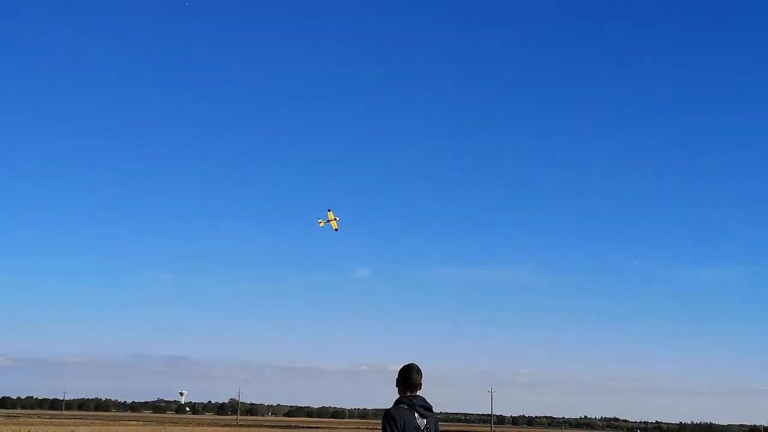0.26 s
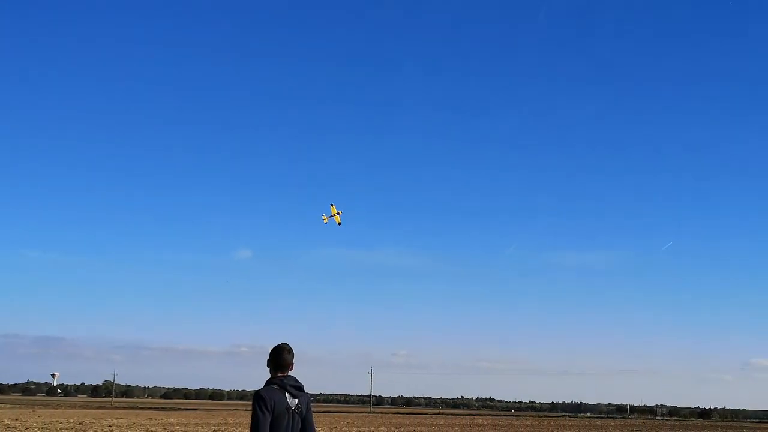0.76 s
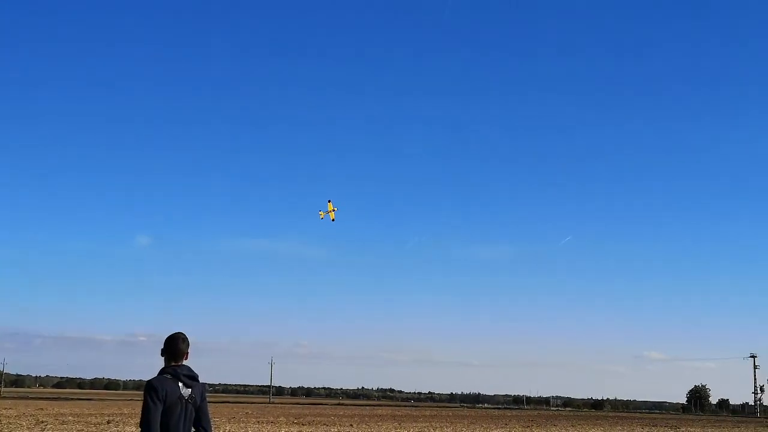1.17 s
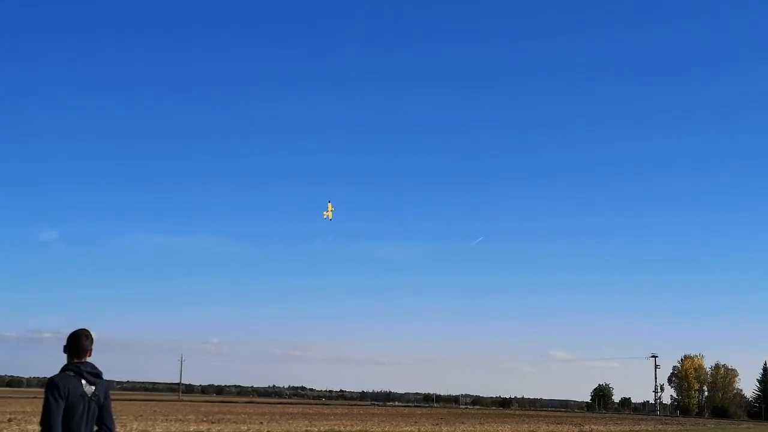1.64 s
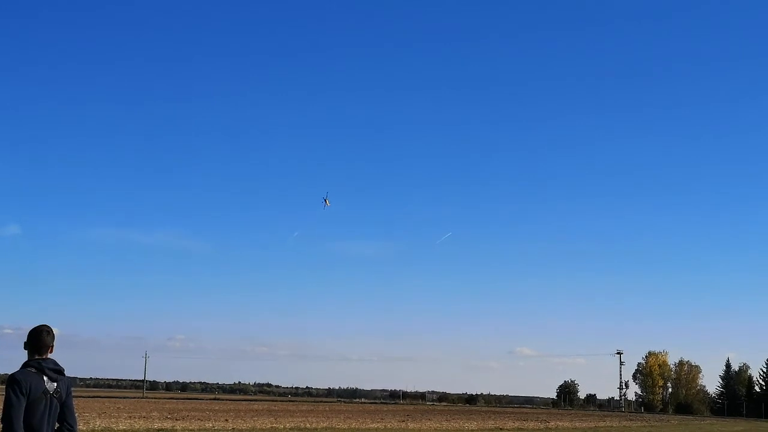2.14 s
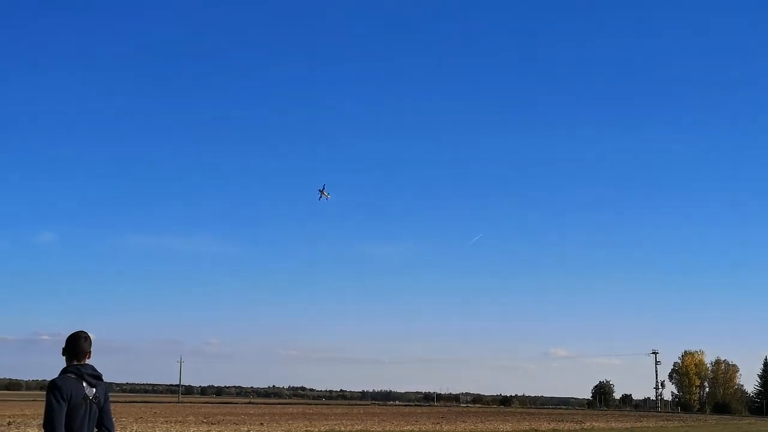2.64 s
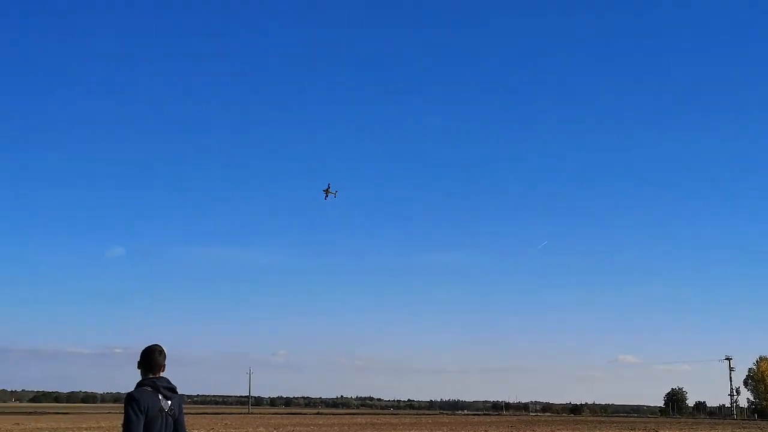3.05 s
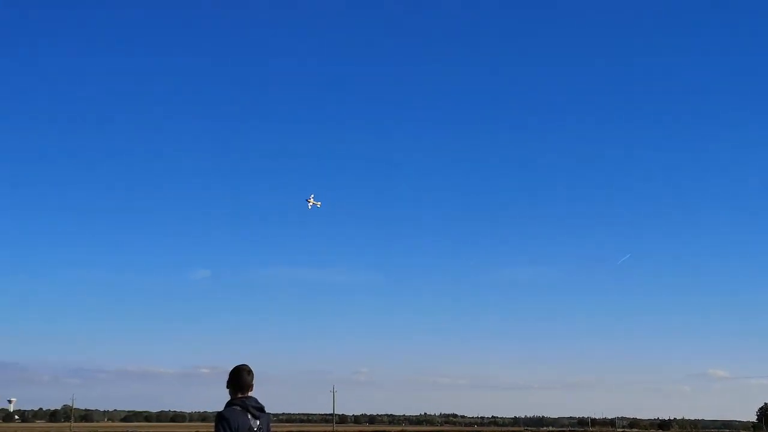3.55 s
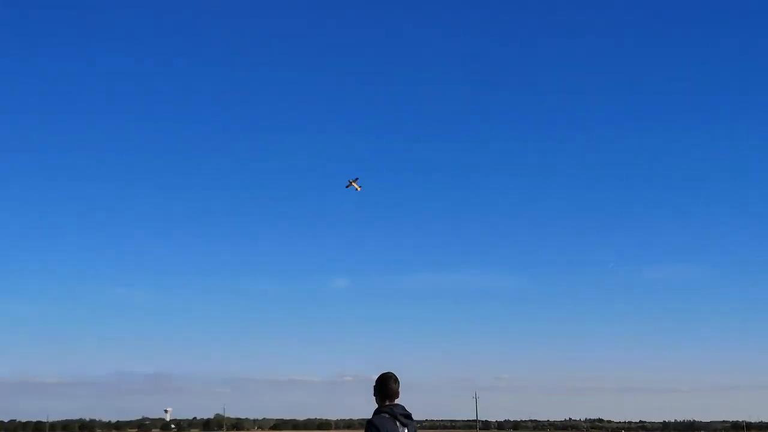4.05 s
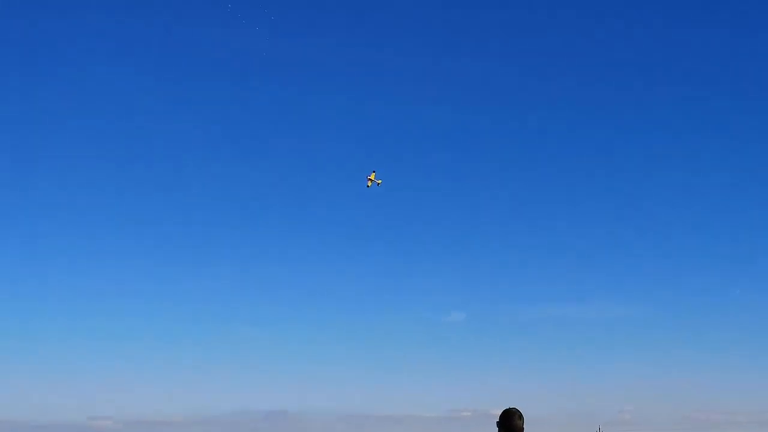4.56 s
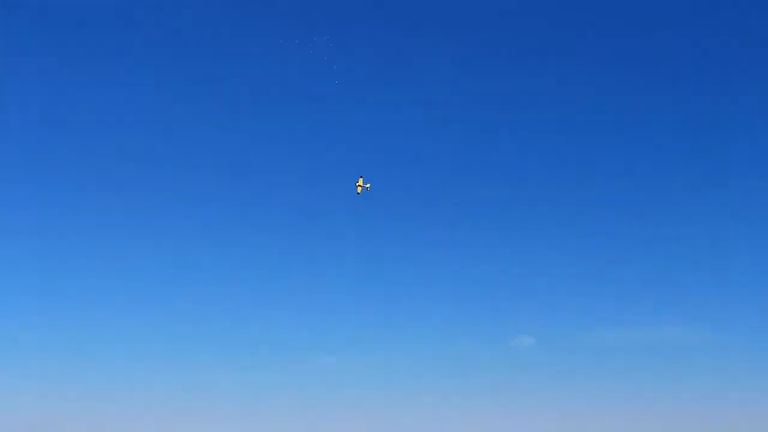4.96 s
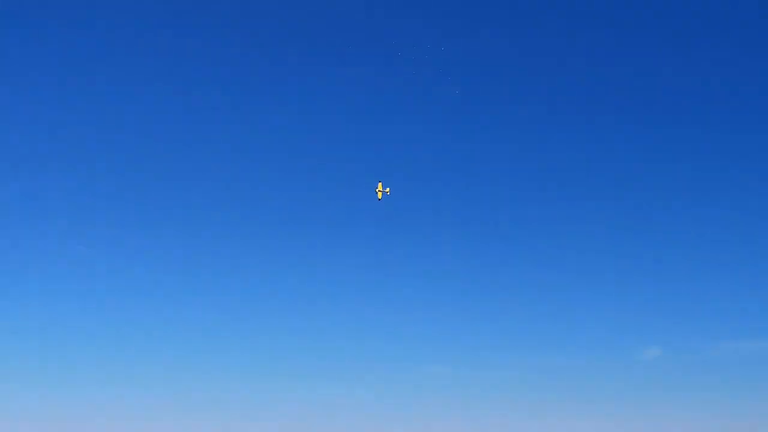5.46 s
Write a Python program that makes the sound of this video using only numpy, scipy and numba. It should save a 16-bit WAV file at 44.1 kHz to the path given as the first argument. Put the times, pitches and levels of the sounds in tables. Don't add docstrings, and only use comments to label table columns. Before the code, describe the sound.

A phone in an open, windy field picks up a distant model aeroplane. From 0 to 2.4 s, gusts press on the microphone with deep rumble, fluttering buffets and short crackly thuds, stronger on the left. Behind them a small two-stroke engine buzzes faintly and roughly, its pitch rising a little towards 1.6 s, then easing, with a swell near 1.8 s. From about 2.7 to 4.1 s the engine is smoother and clearest, a nasal drone with raspy, bright flickers as it rolls; wind thuds are fewer, though gusts still swell near 3.2, 3.6 and 4 s. Pitch climbs to its highest around 4.4-4.7 s while hard wind thuds return. Just before 5 s the engine fades and slows quickly, becoming a faint, lumpy idle with irregular cracking pops until the end at 5.7 s. A very soft hiss of stubble and trees sits underneath, with no audible room reverberation.

```python
import sys
import numpy as np
from scipy import signal
from scipy.fft import rfft, irfft
from scipy.io import wavfile
from scipy.ndimage import uniform_filter1d
from numba import njit

SR = 44100
rng = np.random.default_rng(int(sys.argv[2]) if len(sys.argv) > 2 else 0)


def gain_from_db(level_db):
    decades = np.asarray(level_db, float) / 20
    return 10 ** decades


def inscribe(sig):
    pcm = np.round(np.clip(np.atleast_2d(sig).T, -1, 1) * 32767)
    wavfile.write(sys.argv[1], SR, pcm.astype(np.int16))


N = 251811


def band(x, lo_hz, hi_hz, order=2):
    return signal.sosfilt(signal.butter(order, [lo_hz, hi_hz], "band", fs=SR, output="sos"), x)


def unit(x):
    return x / np.sqrt(np.mean(x ** 2))


def noise_band(lo_hz, hi_hz):
    return unit(band(rng.standard_normal(N), lo_hz, hi_hz))


def walk(rate_hz):
    hold = int(SR / rate_hz)
    steps = np.repeat(rng.standard_normal(N // hold + 1), hold)
    return unit(uniform_filter1d(uniform_filter1d(steps, hold), hold)[:N])


def curves(table):
    s, *columns = np.transpose(table)
    return [np.interp(np.arange(N) / SR, s, column) for column in columns]


def clicks(at, size):
    taps = np.floor(at)[:, None] + np.arange(-7, 9)
    away = taps - at[:, None]
    shape = np.sinc(away) * np.cos(np.pi * away / 16) ** 2
    place = np.clip(taps, 0, N).astype(int)
    return np.bincount(place.ravel(), (size[:, None] * shape).ravel(), N + 1)[:N]


def resonate(x, hz, sharpness):
    sos = np.concatenate(signal.iirpeak(hz, sharpness, SR))
    return signal.sosfilt([sos, sos], x)


def ring(x, modes, shimmer_db):
    out = 0
    for hz, width_hz, level_db in modes:
        swell = gain_from_db(level_db + shimmer_db * walk(5.04))
        out = out + swell * resonate(x, hz, hz / (1.5 * width_hz))
    return unit(out)


@njit
def sweep(x, hz, width):
    y, b, l = np.empty(len(x)), 0., 0.
    for i in range(len(x)):
        g, k = np.tan(np.pi * hz[i] / SR), width[i] / hz[i]
        v = (b + g * (x[i] - l)) / (1 + g * (g + k))
        b, l, y[i] = 2 * v - b, l + 2 * g * v, k * v
    return y


def sweep_ports(x, hz, width_hz):
    width_hz = width_hz * np.ones(N)
    return np.array([sweep(port, hz, width_hz) for port in x])


def glide(x, hz, width_hz):
    return unit(sweep_ports(sweep_ports(x, hz, width_hz), hz, width_hz))


# start_s [s], firing_hz [Hz], roughness [0-1]
THROTTLE = [(0, 83.32, 0.4), (.82, 84.56, 0.2), (.9, 82.76, 0.4), (1.1, 85.96, .3), (1.55, 94.04, .3),
            (1.74, 93.4, .28), (1.95, 89.26, .2), (2.5, 87.38, .07), (2.8, 89.1, 0.11), (3.48, 90.83, 0.12),
            (3.61, 91.0, 0.08), (3.8, 94.86, 0.11), (4.18, 96.86, 0.13), (4.38, 99.04, .15),
            (4.73, 98.7, 0.22), (4.9, 88.95, .3), (5.2, 71.34, .14), (5.71, 73, 0.12)]
# [dB, gain as the belly turns to the listener]
ROLL = [(0, -49, 0.5), (.47, -55, -3), (.64, -48.5, -4.5), (.88, -57.5, 2.5), (1.1, -51, -3),
        (1.45, -50.5, 2), (1.8, -42.5, -10.5), (2.3, -57.5, -2), (2.78, -43.5, -1), (3.16, -37, -1.5),
        (3.47, -41.5, 1), (3.93, -37.5, -2), (4.1, -44.5, 9.5), (4.42, -45.5, 3), (4.63, -56, 10),
        (4.8, -49, 8), (5.02, -60, -1.5), (5.2, -56, -1.5)]
# [Hz, resonance of that side]
EXHAUST = [(.27, -5, 1.5, 2630), (.38, -19, 0.5, 2783), (.8, -6.5, -2.5, 2582), (1.1, -18, -9.5, 2245),
           (1.25, -10, -9.5, 2250), (1.5, -7, -1, 2560), (1.87, -15, -7, 2623), (2.05, -10.5, -4, 2618),
           (2.36, -5, -8, 2660), (2.57, -21.5, -13, 2567), (2.9, -17, -5.5, 2534),
           (3.05, -14.5, -11.5, 2293), (3.6, -11.5, -15, 2270), (4.2, 0, -2.5, 2210),
           (4.39, -13, -16, 2126), (4.58, -1, -6, 2083), (4.85, -6.5, -4, 2263), (5.0, -20, -18, 2407)]
# [dB, left minus right]
PATH = [(0, 1.7, 1870, -24, -2), (.45, 1.7, 1774, -40, -10.5), (.9, 1.9, 1830, -23.5, -2.5),
        (1.2, 1.65, 1760, -71, -5.5), (1.55, 1.8, 1820, -46, -1.5), (1.74, 1.7, 1880, -35, 0),
        (2.0, 1.6, 1693, -38.5, -4.5), (2.4, 1.8, 1740, -36.5, -4.5), (2.75, 1.785, 1677, -32.5, 0.5),
        (3.6, 1.826, 1740, -33.5, 0.5), (3.9, 1.738, 1904, -52.5, -1), (4.1, 1.826, 1792, -38, 6.5),
        (4.35, 1.93, 1773, -30.5, 5.5), (4.7, 1.9, 1860, -40.5, 8.5), (4.87, 2.05, 1782, -32.5, -2),
        (5.0, 2.2, 1740, -48, -4), (5.2, 2.1, 1730, -47, 1), (5.71, 1.95, 1748, -50, 1.5)]


def aeroplane():
    hz, rough = curves(THROTTLE)
    level_db, body_db = curves(ROLL)
    aim_db, bark_db, bark_hz = curves(EXHAUST)
    echo_ms, pipe_hz, blade_db, bearing_db = curves(PATH)
    rough, idle = np.clip(rough, 0, 1), np.clip((84 - hz) / 8, 0, 1)
    side = np.array([[.5], [-.5]])
    pipe_pan = gain_from_db(side * (-7.5 + bearing_db))
    treble_pan_db = side * (-.5 + bearing_db - .56 * aim_db)
    turns = np.cumsum(hz) / SR
    drive, gas = firings(turns, rough, idle, echo_ms)
    bright = drive + .15 * gas

    out = airframe(drive, body_db, echo_ms, idle)
    out += pipe_pan * glide(drive, pipe_hz, 172)
    rasp_db = aim_db - 17.5 * idle
    rasp_hz = 3565 + 12 * (hz - 88)
    out += gain_from_db(-2 + treble_pan_db) * exhaust(bright, bark_db, bark_hz, rasp_db, rasp_hz)
    out += gain_from_db((bark_db + rasp_db) / 2) * fizz(drive + gas)
    out = gain_from_db(level_db) * cancelled(out, echo_ms, idle)

    panels = gain_from_db(-.5 + treble_pan_db) * glints(bright * gain_from_db(1.5 * walk(45)))
    treble_end = signal.butter(8, 7700, fs=SR, output="sos")
    blades = gain_from_db(blade_db + 2.5 * walk(14)) * np.sqrt(2) * np.sin(4 * np.pi * turns)
    return signal.sosfilt(treble_end, out + panels) + blades


# start_s [s], peak_db [dB]
CRACKS = [(4.958, -38), (4.995, -38), (5.033, -38.5), (5.138, -37), (5.194, -39), (5.235, -41.5),
          (5.265, -42.5), (5.333, -39), (5.376, -38.5), (5.432, -40.5), (5.459, -40), (5.487, -36.5),
          (5.515, -35.5), (5.542, -38.5), (5.583, -38.5), (5.612, -38.5), (5.639, -34.5), (5.678, -35.5)]


def firings(turns, rough, idle, echo_ms):
    at = np.interp(np.arange(1, int(turns[-1])), turns, np.arange(N))
    chance = rng.standard_normal((N // 300, 4))[:len(at)].T
    index = at.astype(int)
    at = at + SR * (.00001 + .0006 * rough[index] ** 2) * chance[0]
    stumble_db = 3 * idle[index] * (-1) ** np.cumsum(chance[3] < 1)
    crack_s, crack_db = np.transpose(CRACKS)
    full = np.abs(at[:, None] - crack_s * SR).argmin(axis=0)
    shift = crack_s * SR - at[full]
    at = at + np.interp(at, np.append(4.85 * SR, at[full]), np.append(0, shift))
    misfire_db = -1.5
    stumble_db = np.where(at > 4.9 * SR, misfire_db, stumble_db)
    stumble_db[full] = 4.5 + .6 * (crack_db - crack_db.mean())
    spread_db = .7 + 5 * rough[index] + idle[index]
    size = gain_from_db(spread_db * np.tanh(chance[1]) + stumble_db)
    late = at + SR / 1000 * echo_ms[index] * (1 + .006 * chance[2])

    direct = clicks(at, size)
    shots = direct + .21 * clicks(late, size)
    puff = signal.lfilter([1], [1, -np.exp(-1 / (.004 * SR))], direct)
    shared = rng.standard_normal(N)
    ports = np.array([shared + 1.2 * rng.standard_normal(N) for _ in range(2)])
    gas = unit(ports * (puff + .4))
    drive = np.sqrt(1 - .6 * rough) * unit(shots) + np.sqrt(.6 * rough) * gas
    return drive, gas


# pitch_hz [Hz], width_hz [Hz], level_db [dB]
DRONE = [(410, 69, -4), (545, 193, 12.5), (704, 150, 7)]
# pitch_hz [Hz], width_hz [Hz], level_db [dB]
BODY = [(710, 140, 3), (1390, 170, -16)]


def airframe(drive, body_db, echo_ms, idle):
    drone_db = .5 - .24 * body_db - 12.5 * idle
    drone = gain_from_db(body_db + drone_db) * ring(drive, DRONE, 1.1)
    shell = glide(drive, 1856 / echo_ms, 248 + 150 * idle)
    return drone + gain_from_db(body_db) * (shell + gain_from_db(-14.5) * ring(drive, BODY, 2.2))


# pitch_hz [Hz], width_hz [Hz], level_db [dB]
BARK = [(2340, 88, -12), (2880, 120, -12.5)]
# pitch_hz [Hz], width_hz [Hz], level_db [dB]
RASP = [(3385, 150, -1.2), (3962, 120, -1.3)]


def exhaust(bright, bark_db, bark_hz, rasp_db, rasp_hz):
    bark = glide(bright, bark_hz, 100) + gain_from_db(-2.5) * ring(bright, BARK, 1.1)
    rasp = glide(bright, rasp_hz, 430) + gain_from_db(-6.5) * ring(bright, RASP, 1.1)
    bark[1] = np.roll(bark[1], int(.12 * SR / 1000))
    return gain_from_db(bark_db) * bark + gain_from_db(rasp_db) * rasp


# pitch_hz [Hz], width_hz [Hz], level_db [dB]
FIZZ = [(4440, 330, 4.5), (5230, 300, 3.5), (5880, 260, 0.5), (6800, 230, -6.5), (7300, 66, -15),
        (9200, 1500, -14)]


def fizz(drive):
    return gain_from_db(-11 + 2.6 * walk(32)) * ring(drive, FIZZ, 1.1)


def cancelled(out, echo_ms, idle):
    out = out - sweep_ports(out, 2517 / echo_ms + 170 * idle, 350)
    return out - .6 * (1 - idle) * sweep_ports(out, 1394 / echo_ms, 110)


# start_s [s, middle of the swell], pitch_hz [Hz], level_db
# [dB], length_ms [ms]
GLINTS = [(.12, 3364, -60.5, 90), (.13, 3764, -64, 60), (.36, 2794, -62, 110), (.62, 2670, -55.5, 54),
          (.65, 3345, -62.5, 55), (1.26, 3626, -66.5, 90), (1.3, 2340, -60, 120), (1.46, 742, -48, 90),
          (1.46, 3800, -63, 39), (1.57, 4800, -60, 25), (1.7, 3874, -62.5, 70), (1.76, 2570, -57.5, 81),
          (1.97, 3364, -59, 40), (2.16, 3570, -65, 90), (2.4, 3420, -58.5, 54), (2.2999, 5460, -65.5, 40),
          (2.301, 2830, -64.5, 89), (2.74, 2526, -49.5, 80), (2.86, 1687, -43.5, 100),
          (2.73, 3500, -62, 81), (2.83, 5200, -70, 34), (3.3, 5100, -63, 55), (3.096, 3530, -53, 84),
          (3.11, 3990, -50, 70), (3.14, 5250, -59.5, 50), (3.08, 5830, -62, 50), (3.309, 5260, -61, 40),
          (3.28, 5770, -61.5, 50), (3.38, 3940, -59, 50), (3.359, 7200, -67, 22), (3.52, 5850, -65.5, 50),
          (3.54, 3840, -49, 36), (3.621, 3390, -54.5, 41), (3.5, 2300, -57, 46), (3.8, 5260, -61, 39),
          (3.8, 5870, -57.5, 40), (3.82, 3440, -51.5, 60), (3.8505, 3940, -53, 50), (3.829, 2284, -50, 54),
          (3.97, 3320, -46.5, 60), (4.027, 2830, -52.5, 90), (4.12, 3870, -51, 68), (4.13, 4380, -59, 41),
          (4.0, 5900, -66, 50), (4.282, 3630, -55.5, 40), (4.449, 2130, -54, 110), (4.53, 2620, -55, 40),
          (4.68, 3996, -60, 90), (4.87, 2365, -56.5, 50), (4.83, 1862, -54, 48),
          (2.99, 6700, -65.5, 35), (2.97, 7150, -69, 25), (3.13, 6600, -64.5, 35), (3.1, 7200, -65, 50),
           (3.19, 5950, -62, 15), (3.04, 5300, -62, 15), (3.16, 5250, -59.5, 12), (3.25, 5800, -60.5, 25),
           (3.46, 5900, -63, 20), (3.66, 5800, -62, 35), (3.52, 5200, -63.5, 20), (3.45, 6600, -68.5, 30),
           (3.78, 6900, -68, 40), (3.98, 6900, -66.5, 40), (4.2, 6500, -66.5, 40), (4.03, 5100, -61.5, 30),
           (4.2, 5700, -63.5, 40), (4.37, 5700, -64, 40), (4.54, 5600, -68.5, 40), (5, 1900, -53.5, 36),
           (4.5, 2200, -51.5, 50), (2.7, 5000, -53.5, 40), (2.9, 2100, -60.5, 27), (4.72, 2500, -58.5, 40),
           (4.54, 3900, -59, 33), (4.3, 3400, -62.5, 30), (1.4, 1100, -52, 63), (1.17, 2300, -60.5, 21),
           (1.2, 5400, -60, 40), (0.55, 4600, -66, 26), (1.36, 720, -55.5, 40), (1.4, 4000, -66, 25),
           (1.75, 5200, -66, 30), (1.4, 1100, -56, 52), (.02, 3000, -53, 30), (5.28, 2000, -67, 50),
           (5.17, 3600, -72, 40), (5.6, 2600, -68.5, 45), (5.6, 4000, -72.5, 50), (5.65, 1200, -60, 50)]


def glints(drive):
    out = np.zeros_like(drive)
    for s, hz, level_db, length_ms in GLINTS:
        reach_s = 3 * length_ms / 1000
        span = slice(max(int((s - reach_s) * SR), 0), int((s + reach_s) * SR))
        age = (np.arange(N)[span] / SR - s) * 1000 / length_ms
        out[:, span] += gain_from_db(level_db) * np.exp(-age ** 2 / 2) * unit(resonate(drive[:, span], hz, 10.5))
    return out


# start_s [s], wind_db [dB], small_db [dB, small eddies over large],
# left_share [0-1, part striking the left port first]
GUSTS = [(0.0, -21.5, -12, 1), (0.51, -18.5, -7, 0.8), (0.6, -17.5, -17.5, 0.9), (0.83, -27, -3.5, 0.9),
         (0.9, -17.5, -10.5, 0.8), (1.92, -23, -12, 0.9), (1.97, -34.5, 0, 0.98), (2.07, -18, -9, 1),
         (2.93, -21.5, -20.5, 0.89), (2.94, -27.5, -13, 0.7), (3.72, -24, -15.5, 0.8),
         (4.13, -23.5, -15.5, 1), (4.21, -19, -9, 0.9), (4.61, -16.5, -7.5, 0.97), (4.69, -23, -8, 0.95),
         (4.99, -15.5, -18, 0.9), (5.12, -23, -19.5, 0.9), (5.71, -19, -18, 0.87)]
# start_s [s, middle], lift_db [dB], width_ms [ms],
# eddy_size [0-1, small to large]
SWELLS = [(.12, -2.5, 57, 0.6), (.56, 2, 61, 0.96), (.78, 0.5, 73, 0.8), (1.001, 7.5, 16, 0.4),
          (1.072, 0.5, 24, 0.98), (1.24, 3, 51, 0.3), (1.3, 4.5, 44, 0.02), (1.43, 2, 120, 0.6),
          (1.55, -1, 43, .3), (1.659, 6.5, 21, 0.6), (1.9, 8.5, 38, 1), (1.968, -11, 14, 0.2),
          (2.2, -2.5, 26, 0.91), (2.29, 3, 20, 0.3), (2.479, 7, 23, .1), (2.611, 1.5, 17, 1),
          (2.761, -2.5, 84, 0.5), (3.03, -9, 30, 0.04), (3.219, 15, 19, 0.6), (3.34, 2, 44, 1),
          (3.631, 10.5, 55, 0.91), (4.001, 9, 82, 0.6), (4.069, -25, 26, 0), (4.46, 5, 29, 0.6),
          (4.6, 2.5, 11, 0.96), (5.02, 5.5, 22, 0.99), (5.28, -5.5, 23, 1), (5.36, -1.5, 35, 0.3),
          (5.452, 1.5, 33, 0.91), (5.56, -8.5, 54, 0.9), (1.1, 0.5, 90, 0.04), (2.06, -3.5, 35, 0),
          (3.28, -3.5, 35, .1), (4.4, 0, 55, 0.6), (.74, 2.5, 50, 0.3), (4.9, 0.5, 45, 0),
          (2.88, 1.5, 30, .6), (.3, 4, 25, 0.1), (5.62, 1, 49, 0.5), (4.64, -1.5, 24, 0.9),
          (5.09, -4.5, 28, 0.4), (.22, -3.5, 28, 0), (1.2, 3.5, 26, .1), (4.24, -3, 25, .1)]


def wind():
    wind_db, small_db, share = curves(GUSTS)
    s, lift_db, width_ms, size = np.transpose(SWELLS)[:, :, None]
    coarse = np.arange(0, N, 64)
    swell_db = lift_db * np.exp(-.5 * ((coarse / SR - s) * 1000 / width_ms) ** 2)
    large_db = np.interp(np.arange(N), coarse, (size * swell_db).sum(0))
    middle_db = np.interp(np.arange(N), coarse, ((1 - size) * swell_db).sum(0))
    rumble_db = wind_db - 1.5 + large_db
    buffet_db = -4 + middle_db - large_db
    flutter_db = small_db + 1.5 + middle_db - large_db
    levels_db = rumble_db, buffet_db, flutter_db, -15.5

    share = np.clip(share, 0, .98)
    left_first = np.sqrt(share) * eddies(*levels_db) + puffs()
    right_first = np.sqrt(1 - share) * eddies(*levels_db)
    lag = int(.56 * SR / 1000)
    soften = signal.butter(1, 450, fs=SR)
    right_later, left_later = [np.roll(signal.lfilter(*soften, x), lag) for x in (left_first, right_first)]
    return np.array([left_first + left_later, right_later + right_first])


def eddies(rumble_db, buffet_db, flutter_db, rip_db):
    burst = 1.5 * np.tanh((.7 * walk(30) + .7 * walk(80)) / 1.5)
    out = gain_from_db(rumble_db + .26 * burst) * noise_band(21, 76)
    out += gain_from_db(rumble_db + buffet_db + 6.8 * burst) * noise_band(70, 155.1)
    out += gain_from_db(rumble_db + flutter_db + 5.16 * burst) * noise_band(171.6, 320)
    rip = unit(band(band(rng.standard_normal(N), 280, 550, order=1), 310, 830))
    return out + gain_from_db(rumble_db + flutter_db + rip_db + 7.7 * burst) * rip


# [dB, crackle over thud]
PUFFS = [(0.265, -19, -8.5), (.325, -24, -6), (0.386, -13, -5.5), (0.412, -22.5, -5.5), (0.456, -23, -1.5),
         (0.47, -23, -6), (0.584, -21.5, -8.5), (0.727, -25, -4), (0.862, -14.5, -11.5), (0.894, -26, 1.5),
         (1.011, -22, -21), (1.061, -22.5, -6.5), (1.099, -19, -6), (1.14, -17.5, -7), (1.168, -20, -11.5),
         (1.28, -22, -3.5), (1.319, -18.5, -9), (1.865, -14, -14.5), (2.193, -16, -16), (2.159, -25, -2.5),
         (2.332, -18.5, -10), (4.326, -16.5, -19.5), (4.389, -14.5, -8), (4.408, -24, 3),
         (4.454, -19.5, -4), (4.563, -16, -3), (4.594, -25, -3), (4.917, -21, -35), (4.995, -24.5, 0),
         (5.65, -21.5, -35.5), (.402, -21, -3.5), (.487, -23, -3.5), (4.578, -20.5, -4), (.908, -22, -6.5),
         (1.125, -22.5, -8), (1.205, -21, -10)]


def puffs():
    thud = noise_band(130, 322)
    crackle = unit(band(band(rng.standard_normal(N), 400, 550, order=1), 350, 850, order=3))
    out = np.zeros(N)
    length_ms = 16.5
    for s, peak_db, crackle_db in PUFFS:
        span = slice(int((s - .003) * SR), int((s + .007 * length_ms) * SR))
        age = 1500 * np.arange(len(out[span])) / SR / length_ms
        swell = (np.e * age * np.exp(-age)) ** 2
        out[span] += gain_from_db(peak_db - 2) * swell * (thud[span] + gain_from_db(crackle_db) * crackle[span])
    return out


# pitch_hz [Hz], level_db [dB per Hz]
FIELD_HISS = [(500, -15.5), (1500, -9), (3000, -13.5), (6000, -28.5), (8000, -49.5), (15500, -57.5)]


def field(gusts):
    hz, level_db = np.transpose(FIELD_HISS)
    f = np.maximum(np.fft.rfftfreq(N, 1 / SR), 1)
    colour = gain_from_db(np.interp(np.log(f), np.log(hz), level_db)) * (f > 300)
    noise = rng.standard_normal((3, N))
    common = rfft(noise[0]) * colour
    own = rfft(noise[1:]) * colour * 2.2 / np.sqrt(1 + (f / 7000) ** 2)
    hiss = unit(irfft(common + own, N))
    hold = np.exp(-1000 / (110 * SR))
    power = signal.lfilter([1 - hold], [1, -hold], np.mean(gusts ** 2, axis=0))
    duck_db = .68 * (10 * np.log10(power + 1e-3) + 20)
    return gain_from_db(-57.5 - duck_db) * hiss


def scene():
    ms = 1000 * np.arange(N) / SR
    plane, gusts = aeroplane(), wind()
    press = .19 * np.exp(-ms / 2.5) - .07 * np.exp(-ms[::-1] / 2.5)
    return plane + gusts + field(gusts) + press


def band_limit(x):
    return signal.sosfilt(signal.butter(12, 15720, fs=SR, output="sos"), x)


def record(dry):
    noise = rng.standard_normal((3, N))
    hiss = gain_from_db(-84.5) * 1.15 * (.7 * noise[0] + 1.2 * noise[1:])
    rounded = np.tanh(.8 * (dry + hiss)) / .78
    return band_limit(rounded)


dry = scene()
out = record(dry)
inscribe(out)
```